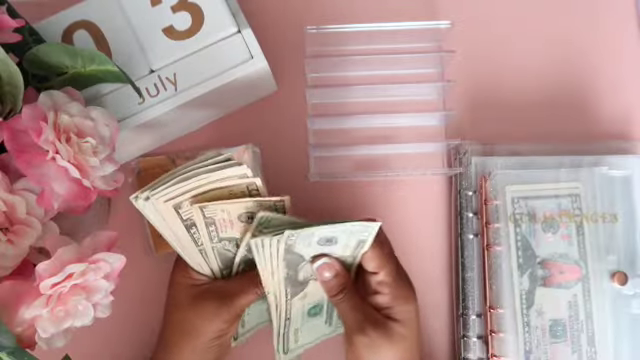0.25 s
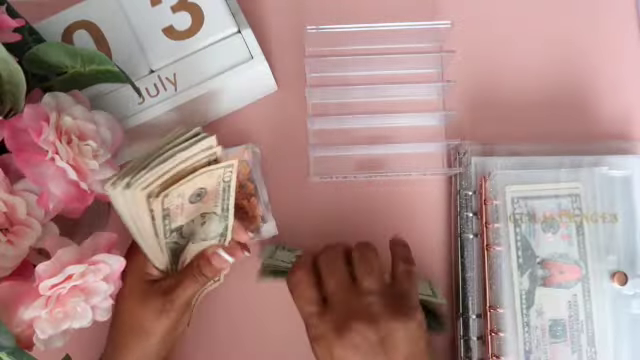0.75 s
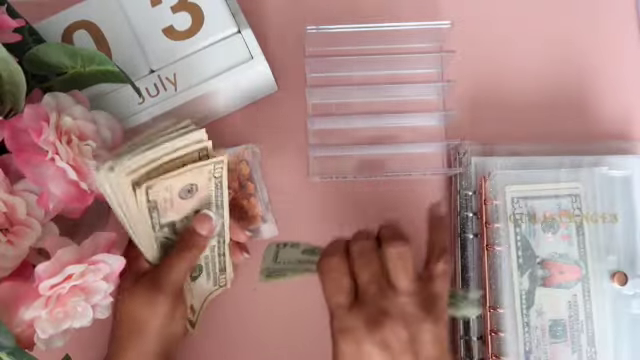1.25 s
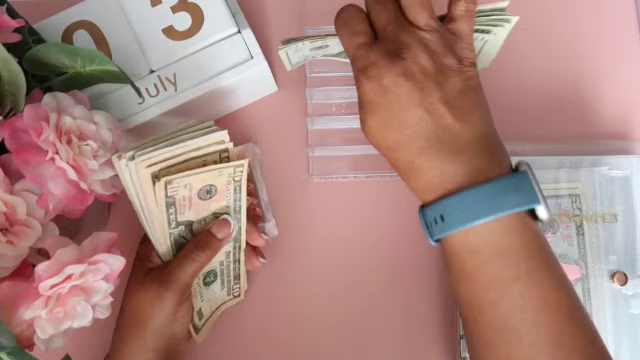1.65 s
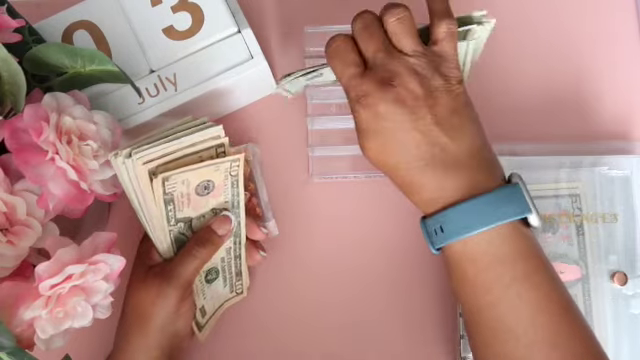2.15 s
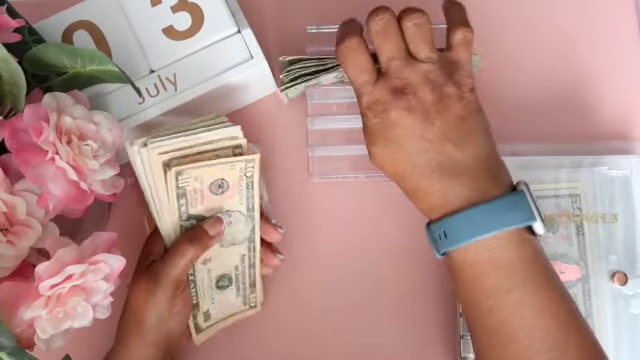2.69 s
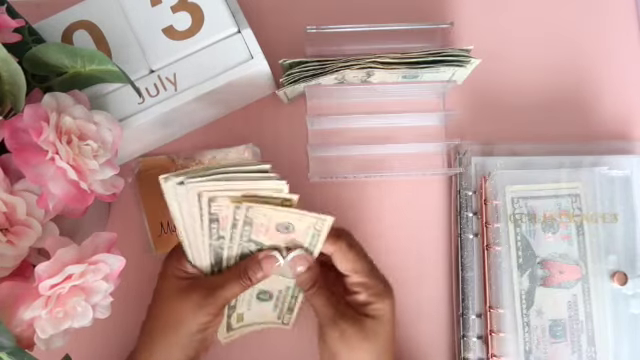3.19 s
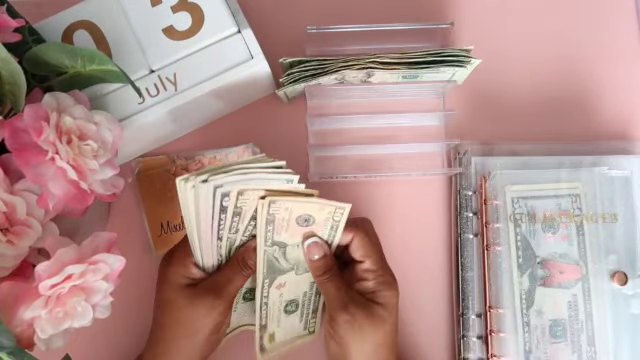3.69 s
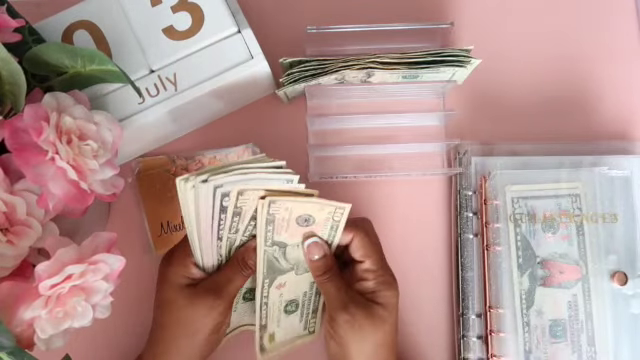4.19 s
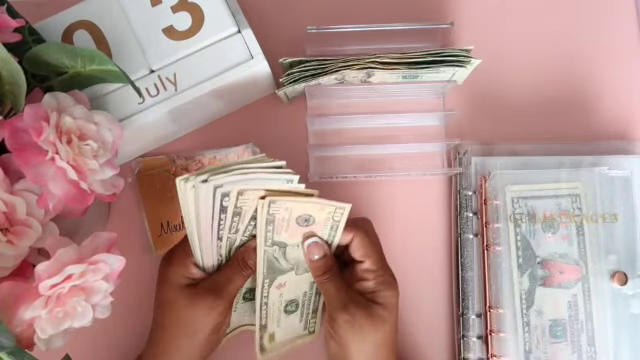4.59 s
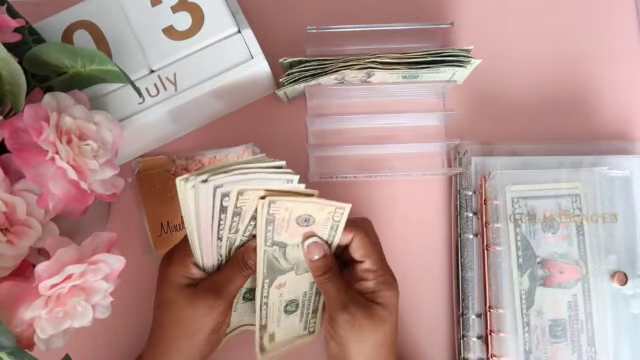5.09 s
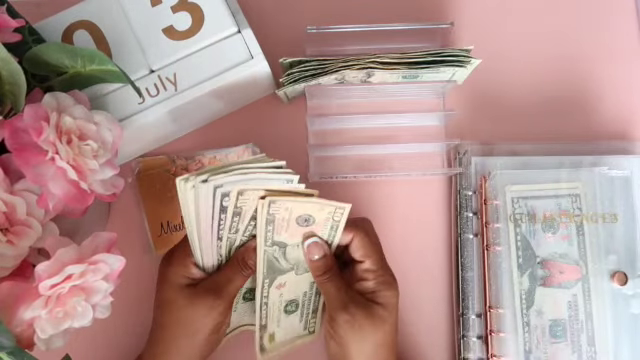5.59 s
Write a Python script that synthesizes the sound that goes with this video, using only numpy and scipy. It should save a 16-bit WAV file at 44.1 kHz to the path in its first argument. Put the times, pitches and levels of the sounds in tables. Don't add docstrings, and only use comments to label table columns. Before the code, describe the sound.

Close phone microphone in a small quiet room. Stiff banknotes rustle softly, then flick sharply; the bundle knocks hard just before one second. Faint touches on a plastic tray follow, then a hard plasticky clack near 2.7 seconds. Notes are drawn off with dry swishes, one loud snap comes near 4.1, softer flicks follow, and crisp slaps come just after 5.

```python
import sys
import numpy as np
from scipy import signal
from scipy.fft import rfft, irfft, next_fast_len
from scipy.io import wavfile
from scipy.ndimage import uniform_filter1d, map_coordinates

SR = 44100
rng = np.random.default_rng(int(sys.argv[2]) if len(sys.argv) > 2 else 0)


def how_loud(loudness_db):
    steps = np.asarray(loudness_db, float) / 20
    return 10 ** steps


def store_pcm(level_fs):
    pcm = np.round(np.clip(level_fs, -1, 1) * 32767).astype(np.int16)
    wavfile.write(sys.argv[1], SR, np.atleast_2d(pcm).T)


N = 257799
END_S = 5.424

# f/Hz, density/dB
AIR_SPECTRUM = [(15, -42), (25, -19.5), (80, -18), (113, -4.5), (302, -10.5), (336, -5), (470, -13.5),
                (642, -14.5), (1050, -16.5), (1290, -19), (3050, -29.5), (4170, -45), (4620, -38),
                (12400, -43), (16100, -77.5), (22000, -120)]
# f/Hz, correlation
AIR_COHERENCE = [(60, 1), (130, 0.97), (290, 1), (640, -0.019), (1410, 1), (3100, 0.49), (6820, -0.63),
                 (15000, -0.55)]
# t/s, level/dB
DRAUGHT = [(0.0, -65), (0.83, -63.5), (0.99, -62.5), (1.26, -66.5), (2.62, -69), (2.81, -63.5),
           (3.03, -66.5), (3.36, -64.5), (3.5, -62.5), (4.01, -63), (4.27, -68), (4.56, -63.5),
           (5.15, -66.5)]
# t/s, peak level/dB
ARM_SHIFTS = [(.07, -73), (.5, -61), (.73, -63), (.83, -55.5), (1.061, -58.5), (1.491, -61.5), (1.73, -64),
              (2.24, -64), (2.718, -56.5), (4.06, -57), (4.38, -62), (4.56, -64), (4.78, -57.5), (5.1, -61)]
STILL_DB, SWELL_DB_PER_S, SETTLE_DB_PER_S = -69.5, 113.5, 84.5

# t of full level/s, hiss level/dB, rise/s, hold/s, buckle f/Hz
SLIDES = [(0, -66.5, .01, .16, 1250), (.198, -56.5, 0.11, 0.0017, 1254), (.355, -62, 0.059, 0.011, 942),
          (1.026, -51.5, 0.017, 0.0075, 1370), (3.53, -68.5, 0.037, 0.061, 2410),
          (3.822, -59, 0.033, 0.057, 2190), (4.0, -68, 0.085, 0.052, 947),
          (4.425, -53.5, 0.12, 0.039, 1220), (4.56, -70, 0.014, 0.0072, 2190),
          (4.64, -67, 0.076, 0.012, 2180), (4.82, -65.5, 0.077, .004, 1140)]
FLICKS = [
    (.384, -41, 0.018, 0.0067, 875),
    (4.078, -46.5, 0.014, 0.039, 935),
    (4.258, -55, 0.014, 0.06, 922.4),
]
PULLS = [
    (.39, -44, 0.044, 0.022, 850),
    (3.325, -47, 0.029, 0.036, 1302),
    (3.59, -51.5, .05, .055, 841.6),
]
FUMBLES = [
    (.598, -71.5, 0.02, 0.011, 1820),
    (1.02, -65, 0.021, 0.027, 1420),
    (1.09, -71.5, 0.023, .04, 1200),
    (1.194, -76.5, 0.036, 0.0033, 1294),
    (1.77, -74.5, 0.068, 0.0044, 1727),
    (2.34, -80.5, 0.072, 0.0032, 900),
    (3.07, -75.5, 0.18, 0.013, 1036),
    (3.186, -81, 0.24, 0.0034, 960),
]
BRUSHES = [
    (.64, -90, 0.066, 0.01, 1800),
    (1.765, -82.5, 0.041, 0.014, 1712),
    (2.97, -93, 0.23, 0.085, 900),
    (3.49, -84, 0.026, 0.054, 1450),
]
SQUARINGS = [
    (.808, -31.5, 0.016, 0.031, 1339),
    (2.668, -47.5, .008, .02, 1250),
    (2.698, -33.5, 0.033, 0.027, 1900),
    (5.094, -36.5, 0.02, 0.0075, 1250),
]
# buckle level re hiss/dB, top air level re hiss/dB, edge f/Hz, fall/(dB per s)
SLIDE = (-0.5, 1, 5204, 372)
FLICK = (11, -5, 4201, 364.5)
PULL = (4.5, -5.5, 4399, 453)
FUMBLE = (15.5, -4, 4197.5, 249.5)
BRUSH = (4.2, 11, 7400, 83)
SQUARING = (9.5, -13, 4700.5, 402)
# hiss level/dB, buckle level/dB, top level/dB, buckle f/Hz, edge f/Hz
REST = (-92.5, 14, -7, 1051, 3996)
RISE_DB = 30
LINGER_DB_PER_S, DULL_DB_PER_S = 60, 79
# f/Hz, density/dB
HISS_SPECTRUM = [(1180, -34.5), (2000, 4), (2640, 1.5), (3010, -8), (3710, 0.5), (4020, -2.5), (4980, -3.5),
                 (9000, -13), (11700, -36), (19800, -120)]
TOP_SPECTRUM = [(4120, -29.5), (7000, -9), (10500, -4), (12100, -4.5), (13100, -10.5), (14400, -12.5),
                (15600, -22)]

# t/s, peak level/dB, f/Hz
CREASES = [(0.125, -42, 4200), (0.183, -46.5, 5490), (0.372, -41, 903), (0.382, -31, 861.7),
           (0.403, -31.5, 818), (0.805, -15.5, 1198), (0.811, -19.5, 1212), (3.327, -38, 2740),
           (3.347, -33.5, 2724), (3.361, -28, 866), (3.381, -36.5, 3736), (3.582, -36.5, 4295),
           (3.8175, -37.5, 4383), (3.996, -46, 5750), (4.287, -32, 2179), (5.081, -22.5, 1983),
           (5.0965, -17.5, 1112), (5.107, -17, 1429)]
POPS = [(0.592, -32.5, 2126), (0.596, -21, 1750), (.597, -29, 1007), (2.698, -22, 780), (4.0755, -12, 960),
        (4.203, -35, 996), (4.2112, -21, 1000), (4.212, -31, 1700), (4.251, -18, 2360), (4.2515, -25, 950),
        (5.0802, -19.5, 3700), (5.096, -24, 3300)]
SLAPS = [
    (0.819, -16, 1345),
    (.829, -20.5, 618),
    (0.919, -40, 4120),
    (1.029, -40, 1476),
    (2.331, -63, 1857),
    (2.679, -23.5, 791),
    (2.696, -20, 1835),
    (2.705, -16, 1861),
    (2.712, -22.5, 2294),
    (5.07, -37, 4100),
]
TICKS = [
    (.9195, -34, 2587),
    (1.017, -44, 4960),
    (1.029, -44, 6475),
    (1.7355, -50, 5600),
    (1.7615, -35.5, 9500),
    (2.6965, -17.5, 8470),
    (5.0805, -27.5, 4600),
    (5.096, -21, 4300),
]
# crack level re peak/dB, thud level re peak/dB, t60/s
CREASE = (-11, -36, 0.015)
POP = (-33.5, -41.5, 0.01)
SLAP = (-10.5, -16, 0.016)
TICK = (-1.8, -63, .009)
# t/s, peak level/dB, f/Hz,
# t60/s
BLIPS = [(0.15, -52, 2200, 0.03), (0.498, -41.5, 814, 0.027), (0.9193, -37, 4250, 0.012),
         (1.0814, -42, 1196, 0.1), (1.1518, -66, 8400, 0.018), (1.1952, -53, 4710, 0.021),
         (1.1962, -54, 2000, .02), (1.5818, -69, 4230, 0.017), (1.6174, -71, 3766, 0.017),
         (3.272, -52, 3100, 0.015), (3.485, -49.5, 10900, 0.0067), (3.615, -45, 850, .03),
         (4.325, -41, 941, 0.025)]

# t/s, peak level/dB, then thud, rim and divider levels re peak/dB
TAPS = [
    (0.8185, -18, -28.5, -1, -12.5),
    (1.7375, -45.5, -2.5, -15.5, -10),
    (1.7627, -45.5, -22, -17.5, -5),
    (1.7774, -41.5, -10, -40.5, -0.5),
    (2.0695, -48, -35, -5.5, 3.5),
    (2.6049, -41, -18.5, -37, -15.5),
    (2.6225, -35.5, -3.5, -29, -10.5),
    (2.672, -36, -8, -8, -12.5),
    (2.6985, -17.5, -19.5, -14.5, -0.5),
]
# f/Hz, level/dB, t60/s
TRAY_MODES = [(770, -13, 0.07), (1230, 3, 0.075), (1640, -9, 0.06)]
DIVIDER_MODES = [(1980, -4, 0.07), (1940, -9, 0.09), (2030, 2, 0.03)]
RIM_MODES = [(2700, 0, 0.05), (3230, 1.5, 0.05), (4400, -0.5, 0.045)]
DESK_MODES = [(180, -12, 0.025), (238.7, 1, 0.094), (360, -2.5, 0.1), (510, -7, 0.098)]

# f/Hz, t60/s
WALL_DECAY = [(150, 0.085), (1000, 0.22), (5000, 0.12), (13000, 0.045)]
# f/Hz, level/dB
PORT_DIFFERENCE = [(60, -24), (300, -26), (1500, -23), (3000, -16.5), (5000, -11), (9000, -4), (14000, -1)]
# f/Hz, level/dB
WHINE = (13000, -99.5)
# f/Hz, level/dB
MIC_RESPONSE = [(100, 0), (12500, 0), (14500, -4), (15200, -17), (15750, -45), (16000, -120)]
# t start/s, t end/s, cutoff f/Hz
STARVED = [
    (.826, .895, 9800),
    (2.71, 2.86, 10500),
    (5.112, 5.2, 13000),
]


def unit(x):
    return x / np.sqrt(np.mean(x ** 2) + 1e-20)


def along(points, hz):
    f, v = np.transpose(points)
    return np.interp(np.log(hz + 1), np.log(f + 1), v)


def wobble(rate):
    knots = rng.standard_normal(int(N * rate / SR) + 4)
    return map_coordinates(knots, [np.arange(N) * rate / SR])


def filtered(x, response):
    m = next_fast_len(N + 8192)
    return irfft(rfft(x, m) * response(np.fft.rfftfreq(m, 1 / SR)), m)[..., :N]


def patchy(x, depth_db):
    z = signal.stft(x, nperseg=256)[2]
    field = uniform_filter1d(rng.standard_normal(z.shape[-2:]), size=4, axis=0)
    field = uniform_filter1d(field, size=8, axis=1)
    return signal.istft(z * how_loud(depth_db * unit(field)), nperseg=256)[1][..., :N]


def arms_db(t):
    s, db = np.transpose(ARM_SHIFTS)[:, :, None]
    change = np.maximum(SWELL_DB_PER_S * (s - t), SETTLE_DB_PER_S * (t - s))
    return np.maximum(STILL_DB, (db - change).max(axis=0))


def room_tone():
    t = np.arange(N) / SR
    turn = lambda f: np.arccos(np.clip(along(AIR_COHERENCE, f), -1, 1)) / 2
    pair = patchy(rng.standard_normal((2, N)), depth_db=-3.0)
    mid, side = filtered(pair, lambda f: how_loud(along(AIR_SPECTRUM, f)) * [np.cos(turn(f)), np.sin(turn(f))])
    hum = how_loud(-10 + 3 * wobble(12)) * np.sin(2 * np.pi * 121 * t + .8 * wobble(8))
    air = unit(np.array([mid + side, mid - side])) + hum
    bass = filtered(air, lambda f: 1 / (1 + (f / 210) ** 6))
    draught_db = np.interp(t, *np.transpose(DRAUGHT))
    return unit(air - bass) * how_loud(draught_db) + unit(bass) * how_loud(arms_db(t))


def grip():
    t = np.arange(0, N, 32) / SR
    power = np.full(len(t), how_loud(2 * REST[0]))
    total = power * np.array([[how_loud(2 * REST[1])], [how_loud(2 * REST[2])], [REST[3]], [REST[4]]])
    kinds = [(FLICKS, FLICK), (PULLS, PULL), (SQUARINGS, SQUARING), (SLIDES, SLIDE),
             (FUMBLES, FUMBLE), (BRUSHES, BRUSH)]
    for rows, (buckle_db, top_db, edge_hz, fall) in kinds:
        for s, db, rise, hold, hz in rows:
            after = np.maximum(t - s - hold, 0)
            before = np.maximum(s - t, 0)
            p = how_loud(2 * (db - RISE_DB * before / abs(rise) - fall * after))
            buckle = how_loud(2 * (buckle_db + LINGER_DB_PER_S * after))
            top = how_loud(2 * (top_db - DULL_DB_PER_S * after))
            power = power + p
            total = total + p * np.array([buckle, top, hz + 0 * t, edge_hz + 0 * t])
    curves = [10 * np.log10(power), *10 * np.log10(total[:2] / power), *total[2:] / power]
    return [np.interp(np.arange(N) / SR, t, curve) for curve in curves]


def fibres(per_s, spread_db, smooth):
    caught = rng.random(N) < per_s / SR
    ticks = caught * how_loud(spread_db * rng.exponential(size=N)) * rng.standard_normal(N)
    return unit(ticks) + smooth * rng.standard_normal(N)


def bank(push, lo, hi, pitch, damping, bed):
    out = np.zeros(N)
    for c in np.geomspace(lo, hi, num=9):
        near = np.exp(-(np.log(pitch / c) / 0.18) ** 2) + bed
        mode = unit(filtered(push, lambda f: 1j * f * c / (c * c - f * f + 1j * damping * f * c)))
        out += near * how_loud(2.5 * wobble(30)) * mode
    return out / np.sqrt(uniform_filter1d(out ** 2, size=8000))


def strokes():
    hiss_db, buckle_db, top_db, pitch, edge_pitch = grip()
    clumps = how_loud(1.6 * wobble(70))
    rub = clumps * patchy(fibres(per_s=8800, spread_db=0.0, smooth=1.1), depth_db=3.5)
    hiss = unit(filtered(rub, lambda f: how_loud(along(HISS_SPECTRUM, f))))
    edge = bank(rub, 3000, 7300, edge_pitch, damping=.07, bed=0.27)
    top = unit(filtered(rub, lambda f: how_loud(along(TOP_SPECTRUM, f))))
    catches = clumps * fibres(per_s=590, spread_db=2.0, smooth=0.46)
    push = filtered(catches, lambda f: f ** 4 / (f ** 4 + 620 ** 4))
    buckle = bank(push, 700, 2700, pitch, damping=.08, bed=.14)
    sheen = .8 * hiss + .55 * edge
    return how_loud(hiss_db) * (sheen + how_loud(buckle_db - 6) * buckle + how_loud(top_db) * top)


def ring(modes, t, rough):
    out = np.zeros(len(t))
    for hz, db, t60 in modes:
        steps = uniform_filter1d(rng.standard_normal(len(t)), size=90)
        drift = rough * np.cumsum(steps) / np.sqrt(SR / 100)
        out += how_loud(db + rng.normal(0, 0.28) - 60 * t / t60) * np.sin(2 * np.pi * hz * t + drift)
    return out


def soft(t, rise):
    return 1 - np.exp(-(t / rise) ** 2)


def snaps():
    out, t = np.zeros(N + SR), np.arange(SR // 5) / SR
    kinds = [(CREASES, CREASE), (POPS, POP), (SLAPS, SLAP), (TICKS, TICK)]
    for rows, (crack_db, thud_db, t60) in kinds:
        for s, db, hz in rows:
            modes = [(hz, 0, t60), (1.45 * hz, -3, 0.68 * t60),
                     (.68 * hz, -8, t60), (1.7 * hz, -6, 0.72 * t60)]
            sheet = soft(t, 0.0015) * ring(modes, t, rough=2.2)
            noise = np.diff(rng.standard_normal(len(t) + 1))
            crack = soft(t, 0.00017) * noise * how_loud(crack_db - 12 - 60 * t / 0.0048)
            thud = how_loud(thud_db) * soft(t, 0.0042) * ring(DESK_MODES, t, rough=0.56)
            out[round(s * SR):][:len(t)] += how_loud(db + 3) * (sheet + crack + thud)
    return out[:N]


def blips():
    out, t = np.zeros(N + SR), np.arange(SR // 5) / SR
    for s, db, hz, t60 in BLIPS:
        tone = ring([(hz, 0, t60), (1.3 * hz, -6, .7 * t60)], t, rough=1.5)
        out[round(s * SR):][:len(t)] += how_loud(db + 3.0) * soft(t, 1.2 / hz) * tone
    return out[:N]


def tray_taps():
    out, t = np.zeros(N + SR), np.arange(SR // 5) / SR
    for s, db, thud_db, rim_db, divider_db in TAPS:
        tray = ring(TRAY_MODES, t, rough=2.2)
        tray += how_loud(divider_db + 4.5) * ring(DIVIDER_MODES, t, rough=3.5)
        tray += how_loud(rim_db) * ring(RIM_MODES, t, rough=1.5)
        thud = how_loud(thud_db + 2.5) * soft(t, 0.0015) * ring(DESK_MODES, t, rough=0.68)
        out[round(s * SR):][:len(t)] += how_loud(db - 3.5) * (soft(t, 0.003) * tray + thud)
    return out[:N]


def scattered(x):
    z = signal.stft(x, nperseg=128)[2]
    turn = uniform_filter1d(rng.standard_normal(z.shape), size=6, axis=1)
    return unit(signal.istft(z * np.exp(3j * unit(turn)), nperseg=128)[1][:N]) * np.std(x)


def walls(x):
    out, step = np.zeros((2, N + SR)), SR // 5
    for k in range(0, N, step):
        hz, t, z = signal.stft(rng.standard_normal((2, SR // 3)), SR, nperseg=256)
        width = np.clip(along([(300, 0.22), (2000, 0.16), (8000, 0.89)], hz), 0, 3)[:, None]
        z = z[0] + width * z[1] * [[[1]], [[-1]]]
        decay = how_loud(-60 * t / along(WALL_DECAY, hz)[:, None])
        tail = signal.istft(z * decay, SR, nperseg=256)[1]
        wet = signal.fftconvolve(x[None, k:k + step], tail / np.linalg.norm(tail[0]), axes=1)
        out[:, k + 200:][:, :wet.shape[1]] += wet
    return out[:, :N]


def scene():
    hits = snaps() + blips() + tray_taps()
    paper = strokes()
    effort = np.sqrt(np.abs(uniform_filter1d(paper ** 2, size=2000)))
    off_desk = how_loud(1.0) * hits + (1 + .8 * np.tanh(effort / .01)) * paper
    side = filtered(scattered(off_desk), lambda f: how_loud(along(PORT_DIFFERENCE, f)))
    side += how_loud(WHINE[1] - 0.5) * np.sin(2 * np.pi * WHINE[0] * np.arange(N) / SR)
    near = (hits + paper) * how_loud([[-.3], [.3]]) + side * [[1], [-1]]
    return near + walls(how_loud(-8.5) * hits + how_loud(-17) * paper) + room_tone()


def low_pass(x):
    return signal.sosfilt(signal.butter(12, 15760, fs=SR, output="sos"), x)


def record(dry):
    t = np.arange(N) / SR
    x = filtered(dry, lambda f: how_loud(along(MIC_RESPONSE, f))) * np.clip((END_S - t) / 0.003, 0, 1)
    for start, end, hz in STARVED:
        lost = np.clip(np.minimum(t - start, end - t) / 0.0051, 0, 1)
        x = x - lost * filtered(x, lambda f: 1 / (1 + np.exp((hz - f) / 60)))
    return low_pass(x)


dry = scene()
out = record(dry)
store_pcm(out)
```